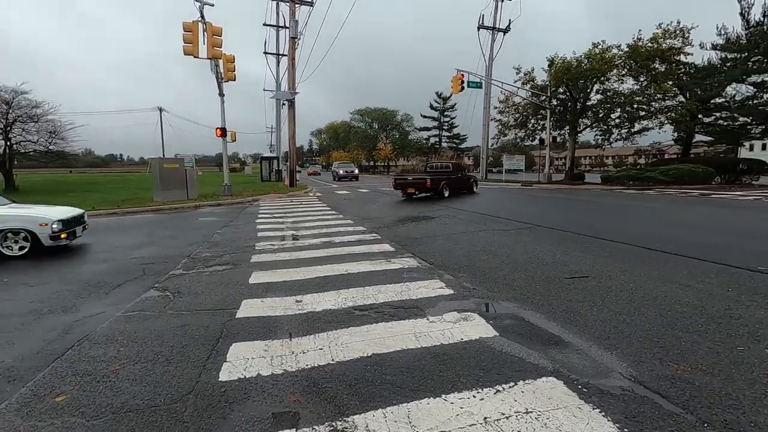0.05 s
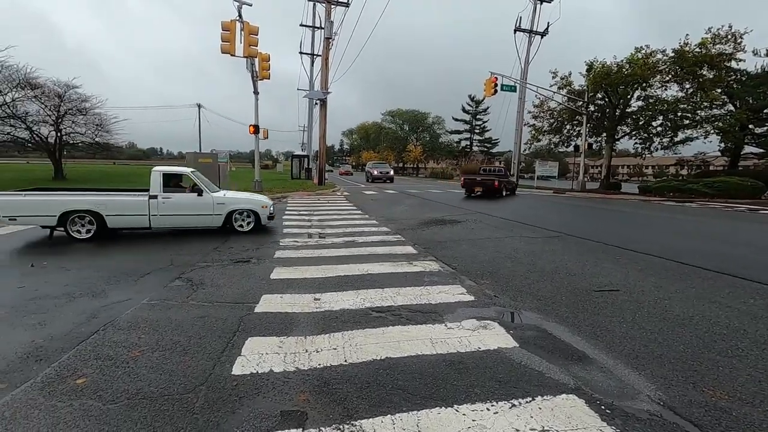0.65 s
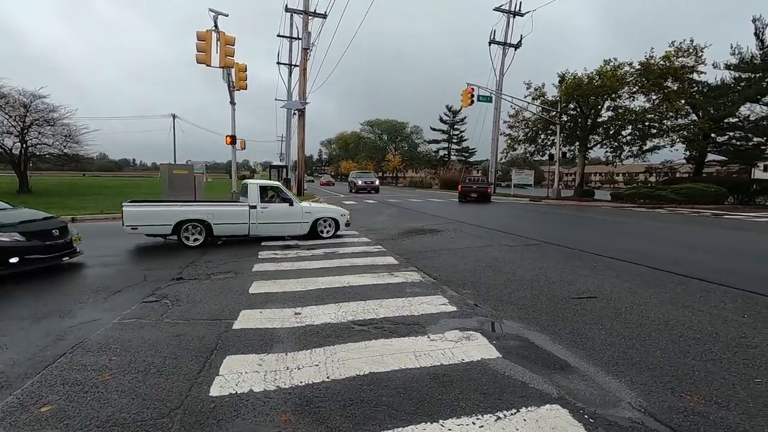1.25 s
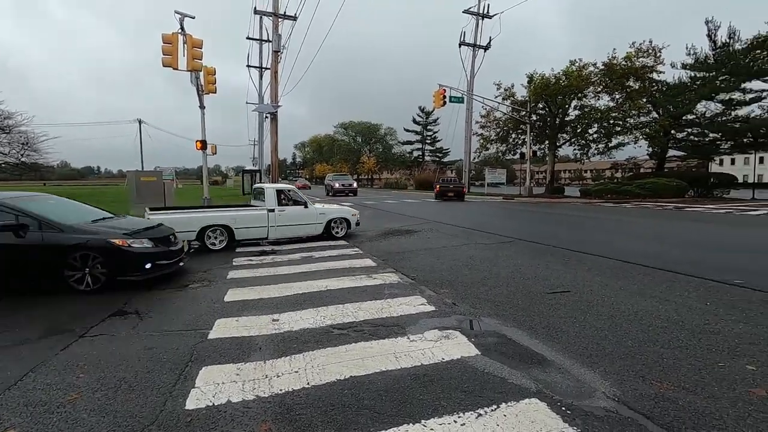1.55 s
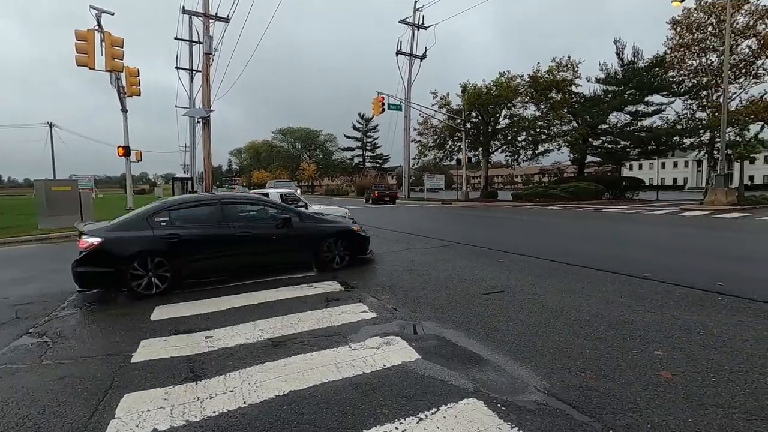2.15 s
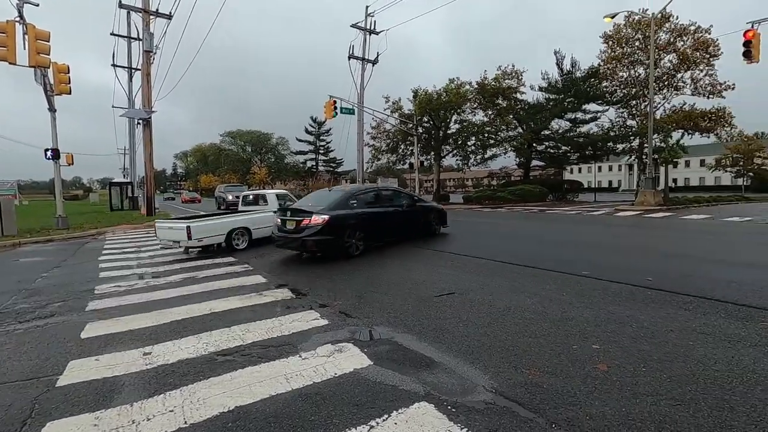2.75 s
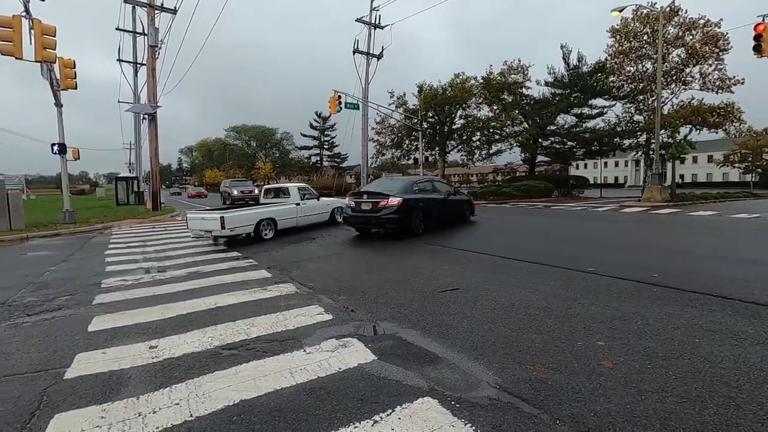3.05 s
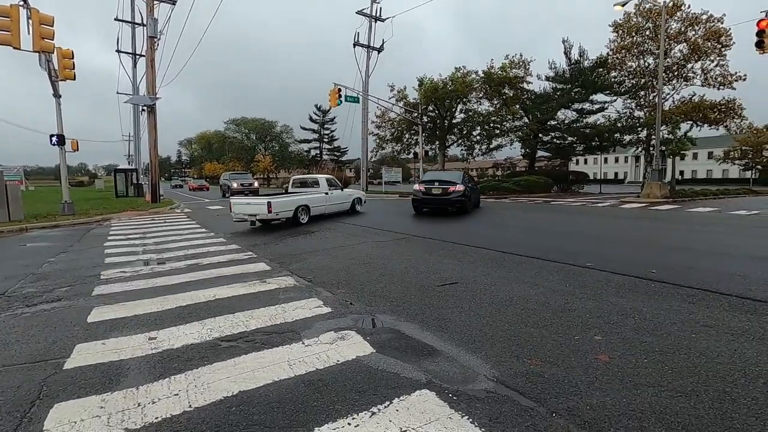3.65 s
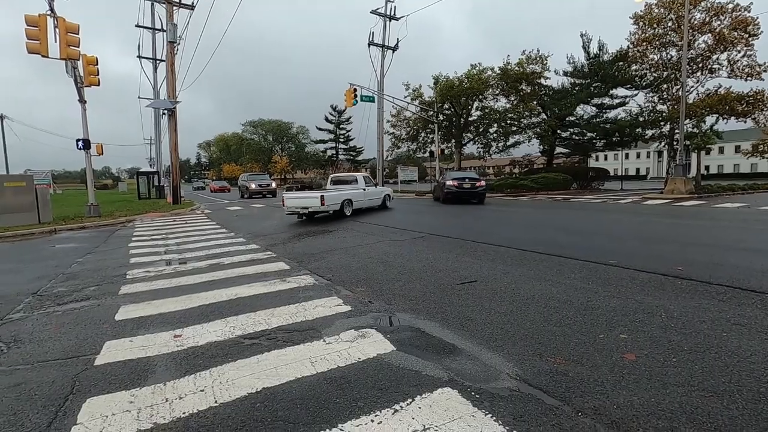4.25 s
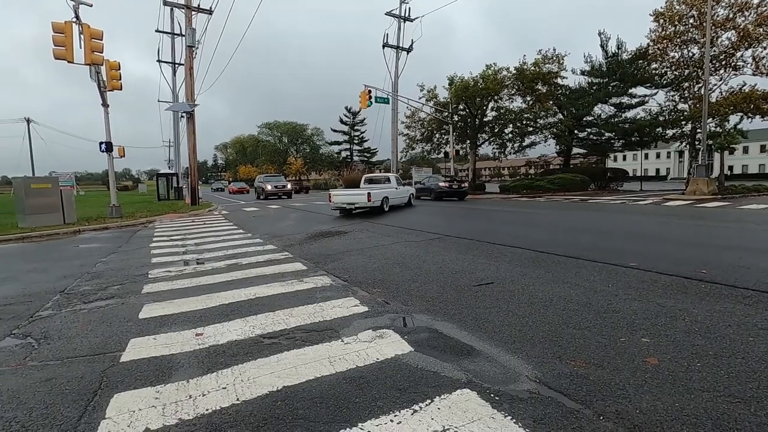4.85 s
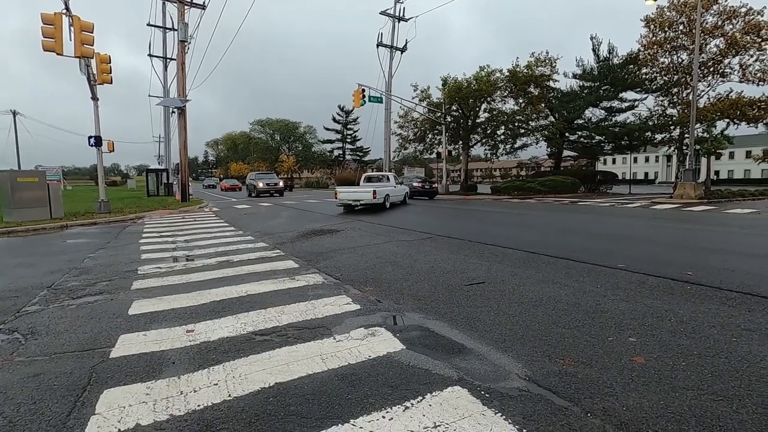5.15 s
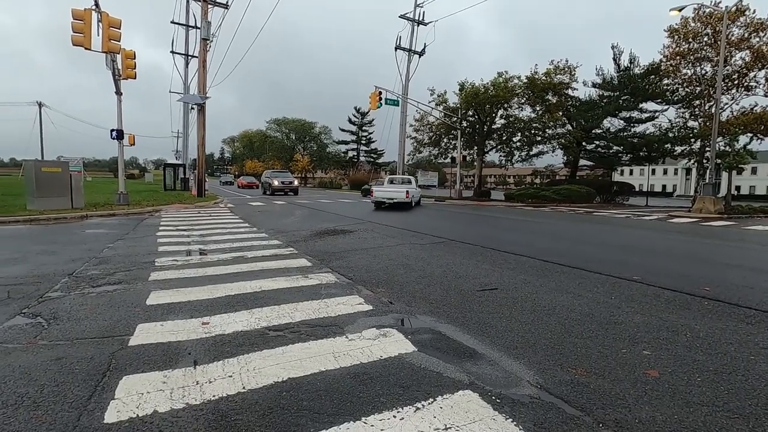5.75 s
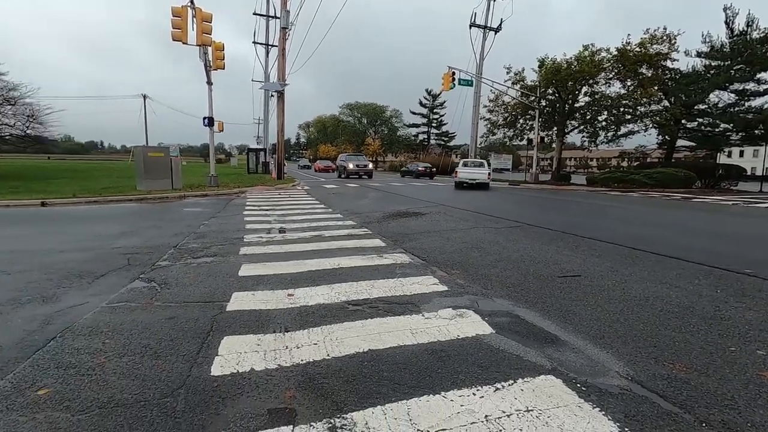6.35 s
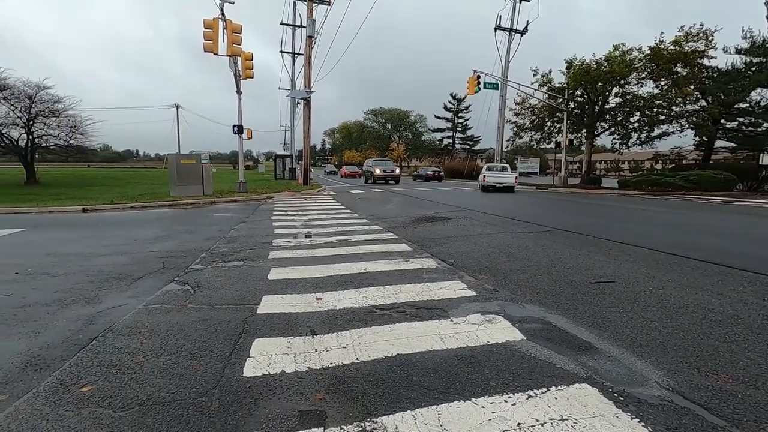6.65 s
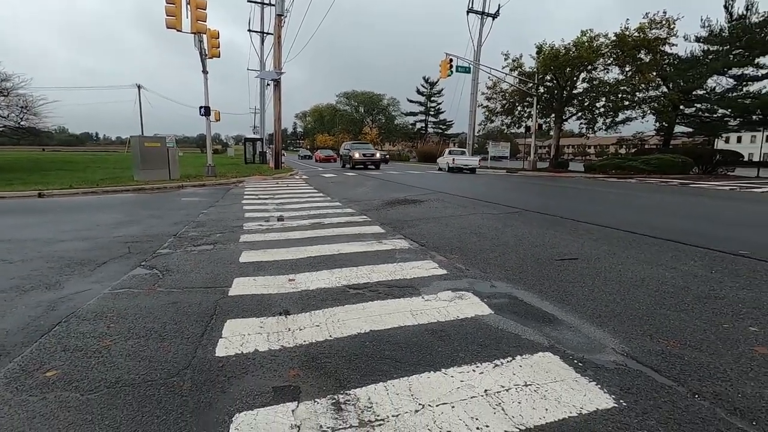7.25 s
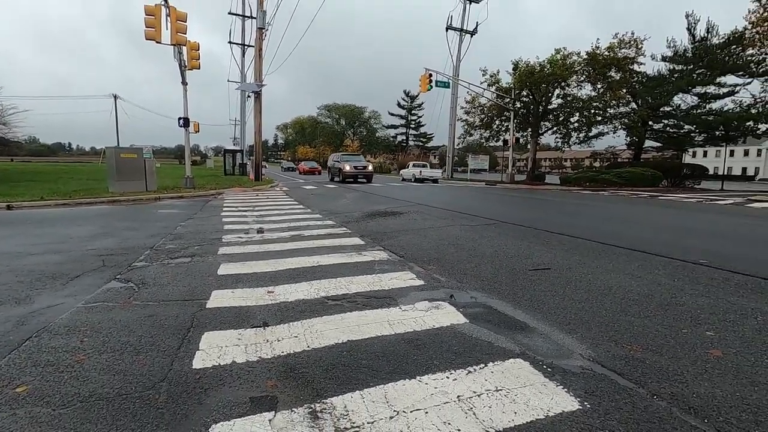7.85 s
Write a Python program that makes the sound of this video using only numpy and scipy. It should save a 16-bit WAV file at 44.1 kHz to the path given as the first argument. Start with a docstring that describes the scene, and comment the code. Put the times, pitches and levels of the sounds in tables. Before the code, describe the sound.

Wet tyres hiss close to a roadside microphone as a pickup's deep exhaust burbles by, with an idling car and distant traffic humming underneath. A quieter car sweeps through puddles with splashes and spray. Then the pickup's engine barks twice, the second rev higher, sinks back, and climbs again in quick pulses, sounding more hollow as it moves off down the street.

```python
"""A wet junction heard from the kerb. At first a car idles nearby and an old six-cylinder pickup rolls
past, its firing pulses booming in the silencer and barking from the tailpipe. Around 2 s a saloon passes
closer, its tyres throwing spray and slapping through puddles. The pickup blips twice, near 2.7 and 3.6 s,
and from 5.5 s pulls away on a pumping throttle. Throughout, tyres hiss as they squeeze water from the
asphalt, and the town rumbles behind."""
import sys
import numpy as np
from scipy import signal
from scipy.fft import rfft, irfft
from scipy.io import wavfile
from scipy.ndimage import uniform_filter1d

SR = 44100
rng = np.random.default_rng(int(sys.argv[2]) if len(sys.argv) > 2 else 0)


def transcribe(u):
    """Save the signal u as a 16-bit wav file named by the first command-line argument.

    u: samples, shape (n,) or (channels, n), limited to [-1, 1]; the rate is SR.
    q: integer samples, one column per channel.
    """
    v = np.clip(np.atleast_2d(u).T, -1, 1)
    q = np.round(v * 32767).astype(np.int16)
    wavfile.write(sys.argv[1], SR, q)


N = 352359
T = np.arange(N) / SR


# The cylinders in firing order. Each row: surplus of the low push, relative strength of the front in dB.
CYLINDERS = [(0.65, 6), (-0.76, -4), (0.18, -12), (0.59, 5.5), (-0.43, -1), (0.57, -9)]
# How much their fronts differ. Each row: time in seconds, factor on those strengths.
FRONT_CONTRAST = [(2.8, 0.71), (3.5, 0.57), (3.8, 0.46), (3.92, 0.34), (4.02, 1.1), (4.15, .75),
                  (4.3, 0.76), (5, 0.89), (6.3, 0.48), (7.05, 0.7), (7.45, 0.75), (7.85, 2.5)]
# Spectra of the burble and the slow chug. Each row: frequency in Hz, relative level in dB.
BURBLE_SPECTRUM = [(20, -54.5), (40, -44), (70, -30.5), (105, -7.5), (165, -5), (200, 1), (260, -5.5),
                   (330, -11.5), (420, -27.5), (700, -31.5)]
CHUG_SPECTRUM = [(20, -47), (35, -37.5), (55, -17.5), (70, -3), (88, 4), (120, 2.5), (170, -8)]


def pickup(scatter=0.76, front_scatter_db=1.0, jitter_s=.00005, gas_db=-16, shut_gas_db=10, gas_turns=0.5):
    """Pulse-train excitation: the mean firing booms, unequal firings burble, their steep fronts bark."""
    hz, load, boom_db, burble_db, bark_db = engine()
    turns = np.cumsum(uniform_filter1d(hz, size=1500) * (1 + 0.002 * walk(30))) / SR  # one per firing
    firings = np.flatnonzero(np.diff(np.floor(turns)))
    push, front_db = np.array(CYLINDERS)[np.arange(len(firings)) % len(CYLINDERS)].T
    # combustion is more erratic at low revs, and the pipe chugs when pulling from them
    erratic = np.minimum((94 / hz[firings]) ** 2, 2.2)
    chance = np.clip(rng.standard_normal((len(firings), 3)).T, -1.6, 1.6)
    push_error, time_error, front_error = chance * erratic
    uneven = clicks(firings, push + scatter * push_error)
    facing_kerb = np.interp(T, [1.8, 2.5, 3.1, 3.6], [.2, 1, 0.81, 0.96])
    chug = np.interp(hz, [80, 118], [.45, .03]) * (1 + 0.48 * load) * facing_kerb
    burble = unit(colour(uneven, BURBLE_SPECTRUM)) + chug * unit(colour(uneven, CHUG_SPECTRUM))
    burble = steady(street(burble, wet=1.0, t60=0.4), size=4000) * undb(burble_db)
    contrast, = curves(FRONT_CONTRAST)
    arrivals = np.clip(firings + (jitter_s * SR * time_error).astype(int), 0, N - 1)
    fronts = steady(clicks(arrivals, undb(front_db * contrast[firings] + front_scatter_db * front_error)))
    # a puff of gas follows each front, stronger at low revs and off the throttle
    puffs = unit(noise() * np.exp(-(turns % 1) / gas_turns))
    fronts += undb(gas_db + shut_gas_db * (1.5 - load)) * (100 / hz) * puffs
    wet = np.interp(T, [3, 4.3, 6], [.5, .5, .75])  # the echo gains with distance
    tailpipe = steady(street(bark(fronts, hz, load), wet, t60=.27), size=2400) * undb(bark_db)
    return boom(hz, turns) * undb(boom_db + .25 * walk(35)) + burble + tailpipe + cracks()


# The pickup rolling, then revving. Each row: time in seconds, firing rate in Hz.
ROLLING_RATE = [(0, 82), (.3, 72.2), (.6, 79.6), (1, 66), (1.3, 60), (2.1, 57.42), (2.55, 58.8)]
REVVING_RATE = [(2.78, 56.36), (2.92, 89.66), (3.04, 95.86), (3.4, 79.1), (3.69, 76.65), (3.8, 91.85),
                (3.95, 121.6), (4.05, 138.3), (4.19, 147.1), (4.29, 142.2), (4.36, 130.2), (4.48, 117.2),
                (4.62, 108.8), (4.85, 103), (5.14, 94.7), (5.28, 84.24), (5.42, 71.4), (5.66, 96.4),
                (5.88, 77.46), (6.05, 95.25), (6.15, 103.6), (6.36, 86.5), (6.59, 112.4), (6.78, 98.5),
                (7.01, 120.1), (7.2, 112.1), (7.43, 130.1), (7.59, 123.5), (7.8, 143.8), (7.9, 139.5),
                (7.98, 135.7)]
# Throttle presses. Each row: start, opening time and time until release in seconds, then boom and bark
# in dB before they sag.
PRESSES = [(-.05, 0.056, 0.22, -21, -54), (2.67, 0.18, 0.18, -13, -24), (2.93, 0.047, 0.19, -27, -37),
           (3.638, 0.19, 0.59, -13, -20.5), (4.6, 0.51, 0.62, -22.5, -26), (5.48, 0.085, 0.19, -26, -28.5),
           (6.011, 0.048, 0.23, -19, -30), (6.418, 0.099, 0.28, -16.5, -25.5),
           (6.81, 0.11, 0.27, -18, -23.5), (7.221, 0.14, 0.29, -16.5, -29.5), (7.62, 0.1, 0.4, -22, -25.5)]
# Throttle shut. Each row: time in seconds, then base levels in dB of boom, burble and bark (at 100 Hz).
COASTING = [(0, -33, -32, -38), (.3, -37, -28, -38), (.45, -28.5, -25.5, -41), (.8, -35.5, -38, -40),
            (1.8, -32, -40, -31), (2.25, -30.5, -33.5, -35), (2.55, -27.5, -29, -35),
            (3.4, -26, -26.5, -35), (4.38, -32, -23, -34), (4.55, -26.5, -28.5, -31.5),
            (5.27, -19, -26, -31.5), (5.42, -20, -26, -29.5), (5.9, -20, -24, -26.5),
            (6.37, -33.5, -25.5, -28), (7.2, -22, -22.5, -27.5), (8, -21, -23.5, -33)]


def engine(flywheel_s=0.034, boom_sag_db_per_s=3, bark_sag_db_per_s=10.5, bark_lag_s=0.038,
           stumble_db_per_octave=18.5, coast_db_per_octave=11, drone_hz=100.1, drone_width_hz=3.5):
    """Inertia smooths the firing rate; throttle and revs set the load (0-1) and three levels in dB."""
    rate, = curves(list(ROLLING_RATE) + list(REVVING_RATE))
    hz = uniform_filter1d(rate, int(flywheel_s * SR))
    octaves = np.log2(hz / 100)
    boom_gain = bark_gain = 0
    for start, opening, closes, boom_db, bark_db in PRESSES:
        age = T - start
        boom_held = undb(boom_db - boom_sag_db_per_s * np.clip(age, 0, closes))
        bark_held = undb(bark_db - bark_sag_db_per_s * np.clip(age - opening, 0, closes))
        boom_gain += boom_held * pedal(age, opening, closes, release=0.084)
        bark_gain += bark_held * pedal(age - bark_lag_s, opening, closes, release=0.1)
    # the burble rises with the boom, most when pulling from low revs
    burble_gain = boom_gain * undb(-18.5 - stumble_db_per_octave * np.maximum(octaves, -.6))
    coasting_db = curves(COASTING)
    coasting_db[2] += coast_db_per_octave * octaves  # the bark grows with the revs
    gains = np.hypot([boom_gain, burble_gain, bark_gain], undb(coasting_db))
    boom_db, burble_db, bark_db = 20 * np.log10(gains)
    load = bark_gain / undb(bark_db)
    # the boom swells as the second firing order meets the pipe's resonance
    drone_db = 5 / (1 + ((hz - drone_hz) / drone_width_hz) ** 2)
    return hz, load, boom_db + drone_db, burble_db, bark_db


def pedal(age, opening, closes, release):
    """Envelope of one throttle press: linear rise, hold, exponential decay."""
    return np.clip(age / opening, 0, 1) * np.exp(-np.maximum(age - closes, 0) / release)


# Response of the silencer. Each row: frequency in Hz, relative gain in dB.
SILENCER = [(55, 0.5), (76, -22), (90, -2.5), (102, -5), (120, 1.5), (145, 5), (190, 4), (235, -0.5),
            (285, -6), (315, -8.5), (370, -6.5), (480, -20.5)]
# Odd orders vary with load and distance. Each row: time in seconds, weights of first and third in dB.
ODD_ORDERS = [(0, -2, -4), (2.1, -1, -5.5), (2.4, -3, -12), (2.8, 0, -4.5), (3.2, -6.5, -1), (3.8, 0, 0.5),
              (4.5, 1, -1.5), (5.3, 0, 0), (5.7, 3, -2.5), (6.2, 0, -2.5), (6.6, -4.5, -1), (7, 2, 1),
              (7.3, 0, 0)]


def boom(hz, turns, dispersion=0.1579):
    """Dispersion: the silencer delays each harmonic of the mean firing by a different amount."""
    orders = np.arange(1, 5)[:, None]
    gains = undb(response(orders * hz, SILENCER))
    gains[::2] *= undb(curves(ODD_ORDERS))
    waves = np.sqrt(2) * np.cos(2 * np.pi * (orders * turns + dispersion * orders ** 2))
    return np.sum(gains * waves, axis=0) / np.linalg.norm(gains, axis=0)


# Tailpipe spectra: bright nearby, hollow far off, dull. Each row: frequency in Hz, relative level in dB.
BARK_BRIGHT = [(200, -38), (380, 1), (480, 6), (570, 0), (680, 8), (870, -1), (1020, -13), (1250, -18),
               (1600, -29), (3000, -49.5)]
BARK_HOLLOW = [(200, -28), (300, -4), (390, 3.5), (455, -6), (520, 3.5), (590, 4), (680, 0), (760, -4),
               (860, -4.5), (1020, -9.5), (1250, -22.5), (1600, -27.5), (3000, -48.5)]
BARK_DULL = [(200, -19), (370, 0), (450, 6), (520, 0), (590, -1.5), (700, 1), (850, -24), (1050, -35),
             (1500, -36.5), (3000, -47)]


def bark(fronts, hz, load, echo=0.086, round_trip_s=0.005236):
    """Pipe resonance colours the fronts; it dulls at low revs, off the throttle and with distance."""
    far = np.interp(T, [4.2, 4.5], [0, 1])
    distant = far * np.interp(hz, [100, 120, 136], [.85, .5, .08])  # high revs bring back a rasp
    shut = np.interp(load, [.55, .9], [.8, 0]) * (1 - far)
    slow = np.interp(hz, [95, 108], [.62, 0])
    dull = np.max([distant, shut, slow], axis=0)
    # each front runs back up the pipe and comes out once more
    fronts = fronts + echo * np.interp(T - round_trip_s, T, fronts)
    rasp = (1 - far) * sharpen(fronts, BARK_BRIGHT) + far * sharpen(fronts, BARK_HOLLOW)
    return (1 - dull) * rasp + dull * sharpen(fronts, BARK_DULL)


# Cracks as the throttle snaps open. Each row: start in seconds, level in dB.
CRACKS = [(2.813, -8), (2.842, -10.5), (2.857, -13), (3.874, -12), (3.901, -13), (3.927, -11),
          (6.139, -18.5), (6.328, -21), (6.522, -20), (6.55, -20), (6.687, -18.5), (6.864, -20), (7.1, -17)]


def cracks(ring_hz=750):
    """Impulse response: single steep fronts ring the tailpipe for a moment."""
    return sum(undb(db) * burst(s, 0.001, 0.0008) * np.sin(2 * np.pi * ring_hz * (T - s))
               for s, db in CRACKS)


# Thuds as the throttle closes. Each row: start in seconds, level in dB.
THUDS = [(0.129, -11), (0.152, -10), (0.17, -11), (0.334, -13), (0.353, -12), (0.37, -17)]


def thuds(ring_hz=135):
    """Damped oscillation: late-burning charges ring the silencer for a cycle or two."""
    return sum(undb(db) * burst(s, 0.0036, 0.0039) * np.sin(2 * np.pi * ring_hz * (T - s))
               for s, db in THUDS)


# The saloon's engine tone. Each row: time in seconds, frequency in Hz, level in dB before the fade.
SALOON_TONE = [(1, 165, -33), (1.35, 158.5, -34), (1.6, 152, -32), (1.9, 152.2, -35), (2.2, 145, -38),
               (3.1, 159.8, -51), (3.6, 196.1, -26), (4.2, 229.8, -37), (4.6, 234.3, -34)]


def saloon(exhaust_db=-34, tail_s=2.88, tail_width_s=0.9):
    """Acoustic filtering: a good silencer leaves one wavering tone, and a rush as the tail swings by."""
    hz, db = curves(SALOON_TONE)
    fade = np.interp(T, [.8, 1.1, 4.5, 5], [0, 1, 1, 0])
    tone = np.sqrt(2) * wavering(hz, depth=0.0072, rate=25.26) * fade * undb(db + 2 * walk(15))
    spectrum = [(60, -15.5), (115, 9.5), (160, -18), (290, -8), (400, -7.5), (560, -15.5)]
    rush = unit(colour(noise(), spectrum))
    return tone + rush * undb(exhaust_db) * np.exp(-((T - tail_s) / tail_width_s) ** 2)


# Puddles. Each row: start in seconds, level in dB, rise and decay in seconds, power share of fine spray.
SPLASHES = [(.88, -31.5, 0.0097, 0.054, 0.16), (1.44, -23.5, 0.00092, 0.0064, 0.04),
            (1.712, -19, 0.0012, 0.021, 0.68), (1.752, -26.5, .004, 0.016, 0.1),
            (1.784, -22.5, 0.0037, 0.027, 0.27), (1.9, -31, .02, 0.038, .5),
            (2.16, -22, 0.0047, 0.036, 0.2), (2.594, -26, 0.0021, 0.017, 0.02),
            (2.663, -31.5, 0.0016, 0.027, 0.7), (2.79, -30.5, 0.0035, 0.015, 0.06)]
# Grit flicked from the tread. Each row: start in seconds, level in dB, pitch in Hz.
GRIT = [(0.462, -39, 4780), (0.487, -33, 4180), (2.038, -40, 5000), (2.319, -31.5, 4185),
        (2.985, -43, 5300), (3.445, -44, 5800), (4.603, -42, 3580), (4.712, -49, 5010), (6.222, -50, 5461),
        (7.089, -43, 4309), (7.21, -58, 5196)]


def splashes(mist_db=-59):
    """Impact noise: tyres burst puddles into heavy drops and fine spray, and grit ticks on the road."""
    heavy = [(300, -13), (700, 14.5), (1500, 15), (2500, 14), (4000, 6), (7000, -29), (10000, -35),
             (13000, -47)]
    light = [(700, -37), (2000, 14), (3500, 9), (5000, 8.5), (7000, -4), (10000, -23), (13000, -30)]
    swells = sum(undb(db) * np.sqrt([[1 - share], [share]]) * burst(s, rise, decay)
                 for s, db, rise, decay, share in SPLASHES)
    water = sum(swell * unit(colour(droplets(4500, 3.0), spectrum))
                for swell, spectrum in zip(swells, (heavy, light)))
    ticks = 0
    for s, db, hz in GRIT:
        peak = [(hz / 3, -20), (hz / 1.34, -9), (hz, 0), (hz * 1.25, -10), (hz * 1.68, -21)]
        ticks += undb(db) * burst(s, 0.00083, 0.0088) * unit(colour(noise(), peak))
    # the finest mist swells while the saloon is right in front
    fine = [(3000, -9), (6000, 0), (9000, -10), (12000, -11), (14000, -28)]
    mist = unit(colour(droplets(900, 5.4), fine)) * undb(mist_db) * burst(2.1, 0.22, 0.93)
    return water + ticks + mist


def droplets(rate, spread_db):
    """Shot noise: tiny impacts of unequal size at random times, rate a second on average."""
    hit = rng.random(N) < rate / SR
    return unit(hit * np.sign(noise()) * undb(spread_db * np.minimum(rng.exponential(size=N), 4.5)))


# Roar of the tread on the asphalt. Each row: time in seconds, level in dB.
ROAR_LEVEL = [(0, -33), (.8, -30.5), (1.5, -30.5), (1.85, -28), (2.25, -29), (2.5, -32), (3.3, -37),
              (5, -35.5), (8, -39)]
# Spectra of wet tyres. Each row: frequency in Hz, relative level in dB.
TREAD_SPECTRUM = [(150, -14.5), (255, 10), (330, 2.5), (410, -7), (560, 0), (850, -3), (1200, -7.5),
                  (1700, -14), (3000, -31)]
HISS_SPECTRUM = [(600, -14.5), (1100, 1.5), (1500, -0.5), (2500, -0.5), (3200, -5), (4200, -8.5),
                 (5200, -23), (7000, -24.5)]
SPRAY_SPECTRUM = [(2000, -14), (3500, 3.5), (4600, 4), (5600, -2), (7000, -7.5), (8400, -17),
                  (10000, -17.5), (11200, -27), (12500, -59.5)]


def tyres():
    """Rolling noise: the tread roars, the water film hisses out from under it and spray patters down."""
    hiss_db, spray_db = tyre_levels()
    roar_db, = curves(ROAR_LEVEL)
    close = np.interp(T, [0, 1.8, 2.7, 4, 8], [0.81, 0.76, 0.52, 0.37, 0.45])  # near drops stand out
    water_db = 0.6 * walk(22)  # deeper water swells hiss and spray together
    roar = unit(colour(noise(), TREAD_SPECTRUM)) * undb(roar_db + 1.4 * walk(22))
    hiss = steady(colour(noise() + 1.24 * close * droplets(4000, 4.4), HISS_SPECTRUM))
    hiss *= undb(hiss_db + water_db + .5 * walk(50))
    spray = steady(colour(noise() + close * droplets(3000, 5.2), SPRAY_SPECTRUM))
    spray *= undb(spray_db + water_db + .5 * walk(46))
    return roar + hiss + spray


# All the traffic, then the saloon's passing wheels. Each row: time in seconds, hiss in dB, spray in dB.
TRAFFIC_LEVELS = [(0, -39, -47), (1.4, -35, -45), (2.4, -34, -46.5), (2.95, -41, -50), (3.83, -41.5, -48.5),
                  (3.92, -45.5, -54), (4.65, -47, -54), (4.78, -43, -52), (5.4, -47.5, -55.5),
                  (8, -47, -56.5)]
SALOON_WHEELS = [(1.88, -33, -37.5), (2.26, -38.5, -38.5)]


def tyre_levels(half_width_s=0.15):
    """Incoherent sources add in power: hiss and spray in dB, swelling as each near wheel goes by."""
    power = undb(curves(TRAFFIC_LEVELS)) ** 2
    for s, *db in SALOON_WHEELS:
        power += (undb(db)[:, None] / (1 + ((T - s) / half_width_s) ** 2)) ** 2
    return 10 * np.log10(power)


# Tones of the idling car. Each row: frequency in Hz, relative level in dB.
IDLE_LINES = [(50.5, -47), (100.5, -41.5), (188, -35.5), (200, -34), (561, -45)]
# Its sound fades. Each row: time in seconds, gain in dB.
IDLE_GAIN = [(0, 2), (1.6, 2.5), (2.4, -5), (4, -7.5), (6, -22.5), (8, -19)]


def idler(rumble_db=-38):
    """A line spectrum over noise: firing orders, fan whine and block rumble of a waiting car."""
    gain_db, = curves(IDLE_GAIN)
    lines = sum(undb(db + 0.37 * walk(22)) * wavering(hz, depth=.009, rate=20) for hz, db in IDLE_LINES)
    spectrum = [(30, -23.5), (52, -7.5), (70, -3.5), (86, -0.5), (125, 0), (170, -18.5)]
    rumble = unit(colour(noise(), spectrum))
    return (np.sqrt(2) * lines + undb(rumble_db) * rumble) * undb(gain_db)


# Spectrum of distant traffic. Each row: frequency in Hz, relative level in dB.
TOWN_SPECTRUM = [(20, -40), (40, -22), (60, -6.5), (110, 0.5), (200, -2), (400, -14), (1000, -31.5)]


def town(level_db=-37.5):
    """Ambient noise: distant traffic merges into a slowly swelling rumble."""
    return unit(colour(noise(), TOWN_SPECTRUM)) * undb(level_db + 2 * walk(2))


def street(x, wet, t60):
    """Reverberation: asphalt, kerbs and house fronts scatter a fading copy of relative gain wet."""
    tail = rng.standard_normal(SR) * undb(-60 * T[:SR] / t60) * (T[:SR] > .003)
    return (x + wet * signal.fftconvolve(x, tail / np.linalg.norm(tail))[:N]) / np.sqrt(1 + wet ** 2)


def undb(db):
    """Decibels to gain."""
    return 10 ** (np.asarray(db) / 20)


def unit(x):
    """Normalisation to rms 1."""
    return x / np.sqrt(np.mean(x ** 2))


def steady(x, size=6000):
    """Normalisation to a running rms of 1."""
    return x / np.sqrt(uniform_filter1d(uniform_filter1d(x ** 2, size), size) + 1e-12)


def curves(table):
    """Linear interpolation of each column in time."""
    s, *columns = np.transpose(table)
    return [np.interp(T, s, c) for c in columns]


def response(hz, points):
    """Frequency response in dB, falling 30 dB an octave above its last point."""
    f, db = np.transpose(points)
    return np.interp(np.log(hz + 1), np.log(f), db) - 30 * np.log2(np.maximum(hz / f[-1], 1))


def impulse_response(points, trailing, size):
    """Cepstral filter design: trailing 0 rings evenly before and after an impulse, 1 only after."""
    cepstrum = irfft(np.log(undb(response(np.arange(size // 2 + 1) * SR / size, points))))
    cepstrum[1:size // 2] *= 1 + trailing
    cepstrum[size // 2 + 1:] *= 1 - trailing
    return irfft(np.exp(rfft(cepstrum)))


def colour(x, points, size=8192):
    """Minimum-phase filter with the given spectrum."""
    return signal.fftconvolve(x, impulse_response(points, 1, size))[:N]


def sharpen(x, points, trailing=0.28, size=8192):
    """Mixed-phase filter that keeps a shock front short."""
    kernel = np.roll(impulse_response(points, trailing, size), size // 2)
    return unit(signal.fftconvolve(x, kernel, "same"))


def noise():
    """White noise."""
    return rng.standard_normal(N)


def walk(rate):
    """Smooth random wander of rms 1."""
    k = max(int(SR / rate), 2)
    return unit(uniform_filter1d(np.repeat(rng.standard_normal(N // k + 1), k), k)[:N])


def wavering(hz, depth, rate):
    """Random frequency modulation of a sine."""
    return np.sin(2 * np.pi * np.cumsum(hz * (1 + depth * walk(rate))) / SR)


def burst(s, rise, decay):
    """Linear rise from time s, then exponential decay."""
    age = np.maximum(T - s, 0)
    return np.minimum(age / rise, 1) * np.exp(-np.maximum(age - rise, 0) / decay)


def clicks(at, sizes):
    """Impulses at the given samples."""
    return np.bincount(at, sizes, N)


def scene():
    """Superposition of all the vehicles and the town in one channel."""
    return (pickup() + thuds() + saloon() + splashes() + tyres() + idler() + town())[None]


def record(dry, top_hz=13500):
    """A steep low-pass filter removes the highest treble."""
    return signal.sosfilt(signal.ellip(8, .2, 70, top_hz, fs=SR, output="sos"), dry)


dry = scene()
out = record(dry)
transcribe(out)
```